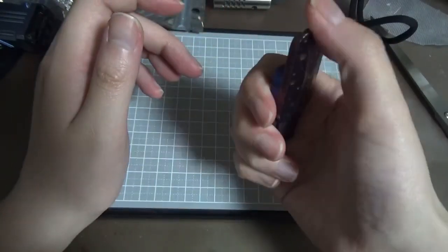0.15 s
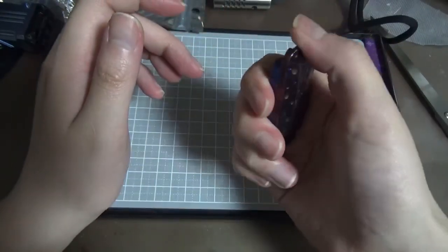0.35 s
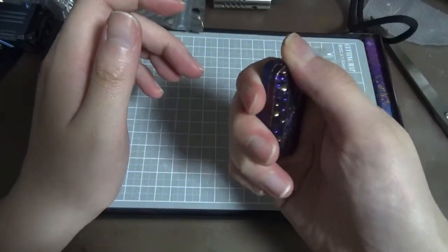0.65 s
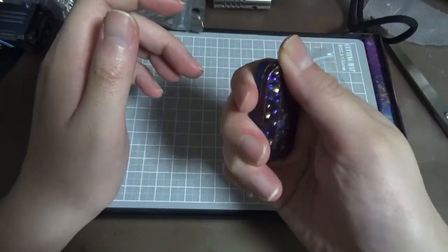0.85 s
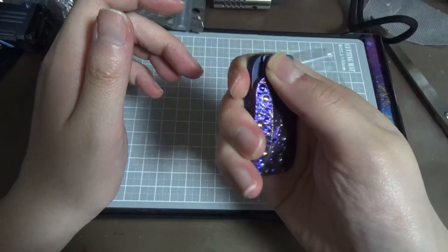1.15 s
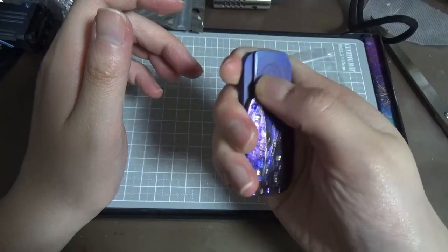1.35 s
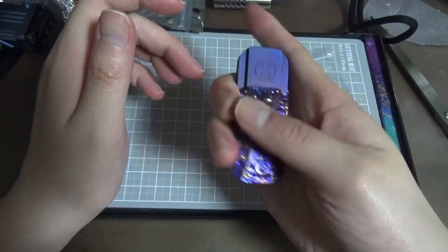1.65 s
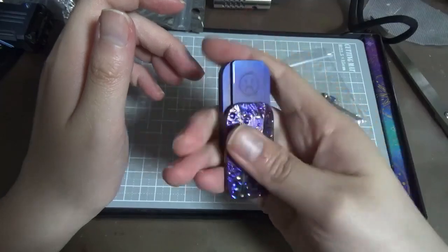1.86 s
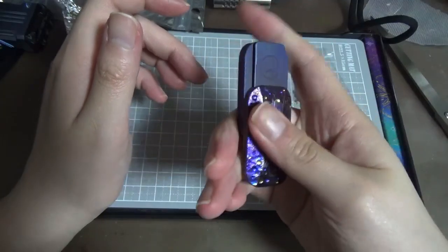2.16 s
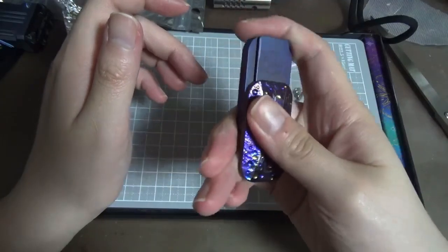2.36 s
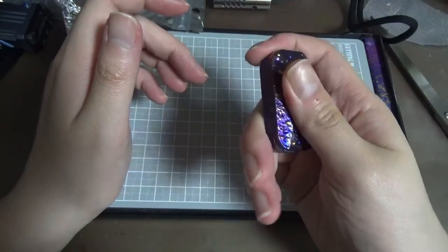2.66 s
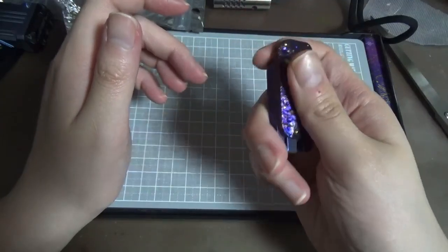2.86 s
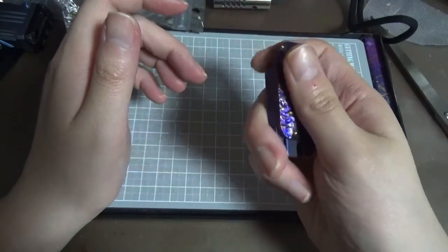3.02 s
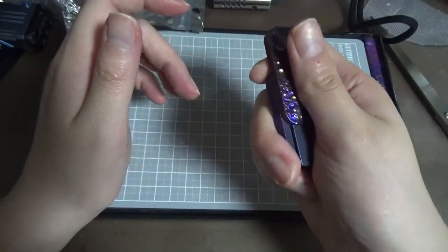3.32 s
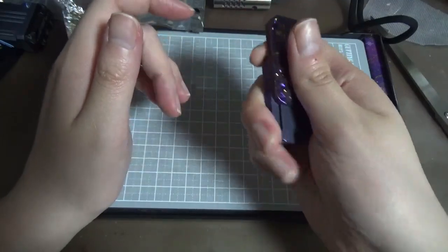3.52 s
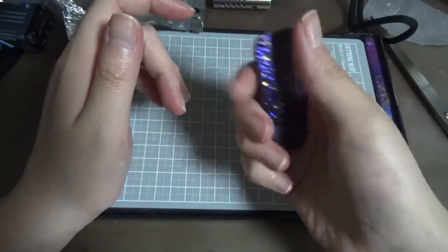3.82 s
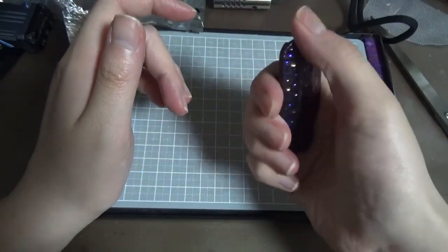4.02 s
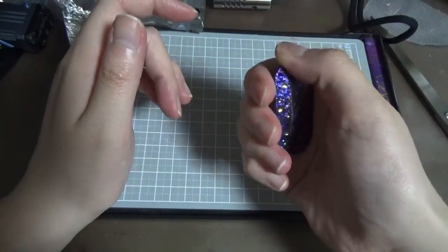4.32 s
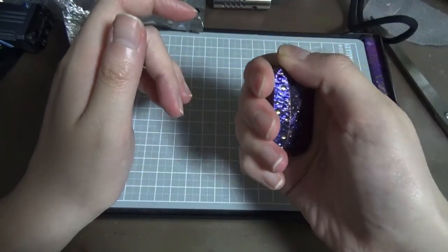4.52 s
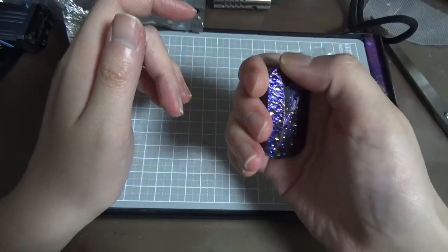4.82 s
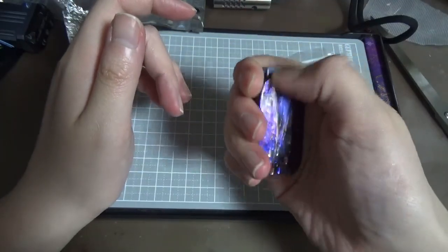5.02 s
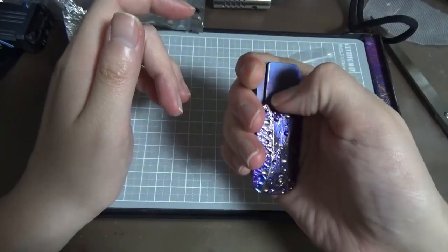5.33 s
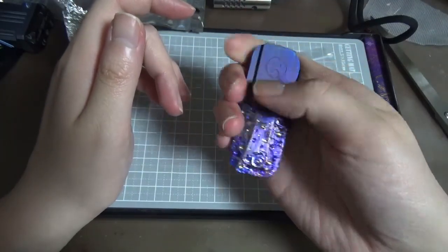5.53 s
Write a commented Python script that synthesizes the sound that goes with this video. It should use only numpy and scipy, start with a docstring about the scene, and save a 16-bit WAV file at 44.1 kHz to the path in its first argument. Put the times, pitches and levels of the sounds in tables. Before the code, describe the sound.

Crisp metallic detent clicks come in rapid bursts with tiny scrapes and gaps between, over faint hum and hiss in a small room.

```python
"""A small room, with a microphone above a desk: a metal slider toy is pushed back and forth in one hand close by.
Its plates scrape briefly (swelling noise), then snap into their detents with short, hand-damped clicks
(bursts of band noise and two decaying sines); now and then a plate sings on (a slowly decaying sine).
Skin rustles on the metal. The loudest clicks overload the recorder.
Early echoes and a short diffuse tail answer, over a faint hum and hiss."""
import sys
import numpy as np
from scipy import signal
from scipy.fft import rfft, irfft, next_fast_len
from scipy.io import wavfile
from scipy.ndimage import map_coordinates

SR = 44100
rng = np.random.default_rng(int(sys.argv[2]) if len(sys.argv) > 2 else 0)


def unload_audio(sound):
    """Save the sound as a 16-bit wav file, at the path given as the first command line argument."""
    columns = np.transpose(np.atleast_2d(sound))
    # keep every value between -1 and 1, then stretch to whole-number steps
    steps = np.round(np.clip(columns, -1, 1) * 32767)
    wavfile.write(sys.argv[1], SR, steps.astype(np.int16))


N = 250488  # length in samples
MIC_HZ = 11130  # upper limit of the microphone

# colour of the metal body: frequency_hz, level_db
BODY_COLOUR = [(100, -32.5), (800, -28), (1150, -22), (1500, -30), (2100, -5.5), (2700, 5.5), (4500, 7),
               (6500, 6), (8300, 11), (10000, 8), (11000, 5.5)]
# the plate scrapes into a detent and snaps home:
# start_s, level_db, lower_resonance_hz, upper_resonance_hz, brightness_db, scrape_db
DETENT_SNAPS = [(0.1885, -4.5, 5480, 8560, 6, -25), (0.2452, -3, 3508, 7810, 2.5, -22),
                (.3713, -8, 3240, 7020, 1, -22), (0.389, -4.5, 2856, 10610, -6, -21),
                (0.8411, -6, 2816, 6490, 0, -21), (.986, -6, 6095, 9870, -3, -23),
                (1.1078, -4.5, 3580, 7330, -0.5, -18.5), (1.1414, -4.5, 3300, 7700, 6, -23.5),
                (1.165, -5.5, 3030, 7730, 6.5, -19), (1.2393, -4, 3280, 10860, -1, -19.5),
                (1.2651, -3.5, 3604, 7620, 2, -21.5), (1.295, -5, 3310, 8380, 1.5, -26),
                (1.337, -2, 3430, 8260, -1, -14), (2.3677, -3, 4580, 7510, -.5, -17),
                (2.385, -3.5, 2950, 6640, -3.5, -22), (2.518, -4, 2620, 10560, 0, -18),
                (2.5781, -5.5, 4240, 10060, 1.5, -20), (2.6445, -4.5, 5420, 7770, 7.5, -19),
                (2.696, -4, 6400, 9100, 10.5, -25), (2.7967, -5.5, 5790, 10030, 1.5, -20),
                (3.0012, -4, 5950, 8170, 10, -20), (3.0385, -3, 4540, 7850, 12, -20),
                (3.0627, -5, 4700, 8000, 6.5, -25.5), (3.0924, -2, 4510, 7720, 10, -25.5),
                (3.1163, -3.5, 4830, 7390, 8, -29), (3.1541, -3.5, 4450, 8660, 6.5, -23.5),
                (4.089, -1.5, 3290, 8550, -0.5, -20), (4.1267, -3.5, 3380, 8900, 3.5, -21),
                (4.2612, -4, 4050, 8440, 7.5, -21), (4.4163, -5, 4330, 8510, 2, -29.5),
                (4.8998, -9, 4230, 8140, -2, -21), (4.997, -11, 4320, 7350, -1.5, -13.5),
                (5.1036, -6, 5020, 6900, 0.5, -28.5), (5.1464, -2, 4470, 8370, 0.5, -22.5),
                (5.1904, -0.5, 4575, 6963, -5, -20), (5.3872, -3, 4052, 8040, -2, -38)]


def amp(db):
    """Decibels to an amplitude ratio."""
    return 10 ** (np.asarray(db) / 20)


def unit(x):
    """Normalise the effective value: scale to rms 1."""
    return x / np.sqrt(np.mean(x ** 2) + 1e-20)


def along(points, hz):
    """Interpolate (frequency_hz, value) points along a logarithmic frequency axis."""
    point_hz, values = np.transpose(points)
    return np.interp(np.log(hz + 1), np.log(point_hz + 1), values)


def filtered(x, response):
    """Linear filtering: the spectrum of x times a response of frequency."""
    n = x.shape[-1]
    padded = next_fast_len(2 * n)
    hz = np.fft.rfftfreq(padded, 1 / SR)
    return irfft(rfft(x, padded) * response(hz), padded)[..., :n]


def lowpassed(x, limit_hz):
    """Band limitation: a very steep, zero-phase low-pass."""
    return filtered(x, lambda hz: 1 / np.sqrt(1 + (hz / limit_hz) ** 160))


def noise(n, colour, lo_hz=0, hi_hz=SR):
    """Spectral shaping: n samples of white noise, coloured within a band and scaled to rms 1."""
    hz = np.fft.rfftfreq(n, 1 / SR)
    in_band = (hz >= lo_hz) * (hz < hi_hz)
    spectrum = rfft(rng.standard_normal(n)) * amp(along(colour, hz)) * in_band
    return unit(irfft(spectrum, n))


def wobble(rate):
    """Slow random modulation: a smooth curve through random knots, rate of them a second."""
    knots = rng.standard_normal(int(N * rate / SR) + 4)
    return map_coordinates(knots, [np.arange(N) * rate / SR])


def add(track, s, sound):
    """Superposition: mix a sound into a track from time s."""
    i = max(0, round(s * SR))
    track[i:i + len(sound)] += sound[:max(0, N - i)]


def background(hiss_db=-55.0, drift_rad=0.5):
    """Stationary coloured noise, and hum tones whose phase drifts in proportion to their frequency."""
    # room noise: frequency_hz, level_db
    hiss_colour = [(25, -19.5), (50, -9), (88, -3), (125, -16), (200, -10.5), (370, -10), (510, -7),
                   (700, -13), (1100, -15.5), (1500, -22.5), (2500, -22.5), (5000, -26.5), (11000, -37.5)]
    # mains and a fan: frequency_hz, level_db
    hum_tones = [(60, -62), (84, -63.5), (120, -70.5), (179.5, -69.5), (497, -66)]
    t = np.arange(N) / SR
    lowest_hz = hum_tones[0][0]
    hum = np.zeros(N)
    for hz, db in hum_tones:
        phase = 2 * np.pi * hz * t + drift_rad * hz / lowest_hz * wobble(6.5)
        hum += amp(db) * unit(np.sin(phase))
    return hum + amp(hiss_db) * noise(N, hiss_colour)


def room(x, wet_db=-19, build_s=0.0033):
    """Diffuse reverberation: convolution with decaying noise, redrawn every 0.2 s."""
    # reverberation time: frequency_hz, t60_s
    reverb_times = [(300, 0.088), (3000, 0.18), (7000, 0.17), (11000, 0.15)]
    out, t = np.zeros(N), np.arange(N) / SR
    step = SR // 5
    for i in range(0, N, step):
        hz, age_s, cells = signal.stft(rng.standard_normal(SR // 3), SR, nperseg=256)
        decay = amp(-60 * age_s / along(reverb_times, hz)[:, None])
        tail = signal.istft(cells * decay, SR, nperseg=256)[1]
        tail *= 1 - np.exp(-(t[:len(tail)] / build_s) ** 2)
        tail /= np.linalg.norm(tail)
        add(out, i / SR, amp(wet_db) * signal.fftconvolve(x[i:i + step], tail))
    return out


def echoes(x):
    """Early reflection: the desk and other near surfaces return delayed, weakened copies."""
    # reflections: delay_s, level_db
    reflections = [(.0062, -32), (.0088, -26.5), (.0105, -31.5), (.0205, -42), (.0235, -34.5)]
    return filtered(x, lambda hz: sum(amp(db) * np.exp(-2j * np.pi * hz * delay) for delay, db in reflections))


def rubs(grit_db=3, steady_db=-70):
    """Skin friction on metal: a faint irregular rustle that swells when the fingers shift their grip."""
    # shifts of grip: centre_s, half_length_s, level_db
    grip_shifts = [(.005, 0.024, -40), (1.545, .012, -57.5), (1.905, 0.074, -59), (3.55, .049, -61),
                   (4.722, .025, -65), (5.644, 0.019, -60)]
    t = np.arange(N) / SR
    level = amp(steady_db + 1.7 * wobble(5.5))
    for s, half_length, db in grip_shifts:
        level += amp(db) * np.exp(-((t - s) / half_length) ** 2)
    grit = unit(amp(grit_db * wobble(580)))
    return level * noise(N, BODY_COLOUR, 0, MIC_HZ) * grit


def rings(waver_db=3.5, choke_s=.015):
    """Free vibration: a plate the fingers let go sounds a thin, wavering tone until a later snap chokes it."""
    # tones: start_s, pitch_hz, level_db, rise_s, t60_s
    free_tones = [(0.39, 2807, -38, .003, 0.27), (.841, 2900, -44, .003, 0.4),
                  (1.337, 3214, -41, 0.0033, 0.35), (1.758, 3770, -48, .003, .2),
                  (1.871, 3260, -43.5, 0.0023, 0.46), (2.021, 8560, -56, 0.0031, .15),
                  (2.384, 5050, -44.5, .003, 0.47), (2.525, 2640, -19.5, .003, 0.063),
                  (2.797, 7560, -34, 0.0027, 0.25), (2.797, 3252, -53, 0.0027, .7),
                  (3.156, 3295, -35, 0.0028, 0.27), (3.438, 3400, -43.5, .003, 0.33),
                  (4.133, 3260, -49.5, .003, 0.41), (4.273, 3950, -41, 0.0033, 0.26),
                  (5.191, 4290, -25.5, 0.0023, .15), (5.193, 4620, -24, .003, 0.15),
                  (5.395, 2730, -34.5, 0.027, 0.49), (5.636, 6000, -41.5, .003, .1)]
    out, t = np.zeros(N), np.arange(SR // 2) / SR
    for s, hz, db, rise, t60 in free_tones:
        later_snaps = [snap[0] - s for snap in DETENT_SNAPS if snap[0] > s + choke_s]
        free_s = min(later_snaps, default=t[-1])
        decay_db = 60 * (t / t60 + np.maximum(t - free_s, 0) / choke_s)
        onset = 1 - np.exp(-t / rise)
        add(out, s, amp(db - decay_db) * onset * np.sin(2 * np.pi * hz * t))
    return out * amp(waver_db * wobble(35))


def slides(swell_db=13, stop_t60_s=0.0025, grit_db=4):
    """Sliding friction: before each snap the scrape grows as the plate speeds up, and dies just after the click."""
    # colour of metal sliding on metal: frequency_hz, level_db
    scrape_colour = [(100, -16.5), (600, -16), (1100, -11), (2200, 3), (5000, 5.5), (8000, -6.5),
                     (11000, 2.5)]
    rest_swell_s = 0.0034  # time to swell by swell_db, from rest
    # softer and longer while the plate keeps moving from detent to detent
    run_gap_s, run_swell_s, run_level_db = .06, 0.0074, -4
    out, t = np.zeros(N), np.arange(-(SR // 25), SR // 100) / SR  # zero at the click
    gaps = np.diff([snap[0] for snap in DETENT_SNAPS], prepend=0)
    for (s, *_, scrape_db), gap in zip(DETENT_SNAPS, gaps):
        offset_db, swell_s = (run_level_db, run_swell_s) if gap < run_gap_s else (0, rest_swell_s)
        rise_db = swell_db * (np.minimum(t, 0) / swell_s + .5)  # zero halfway through the swell
        stop_db = -60 * np.maximum(t, 0) / stop_t60_s
        add(out, s + t[0], amp(scrape_db + offset_db + rise_db + stop_db) * noise(len(t), scrape_colour))
    return out * unit(amp(grit_db * wobble(730)))


def contacts():
    """Impact excitation: yields start_s, level_db, lower_hz, upper_hz, brightness_db, knock_db of each contact."""
    # the plate chatters as it seats: start_s, level_db, lower_resonance_hz
    chatter_hits = [(0.191, -6.5, 5530), (0.1951, -4, 3360), (.201, -5.5, 4540), (0.2515, -4.5, 3390),
                    (.364, -24, 3130), (.377, -3.5, 3210), (0.4119, -7, 2750), (1.112, -5, 3640),
                    (1.1156, -8.5, 2760), (2.3707, -8.5, 3720), (2.375, -4, 2780), (2.379, -9, 2270),
                    (2.5226, -6, 2570), (2.5302, -4.5, 2650), (2.585, -5.5, 5440), (4.0941, -6, 3260),
                    (4.1017, -6, 4500), (4.1325, -6.5, 3570), (4.2735, -6.5, 3460), (4.4134, -10.5, 4250),
                    (4.4223, -8, 5220), (4.9037, -9, 3470), (4.9943, -7, 3360), (5.0, -6, 3550),
                    (5.006, -5.5, 3390), (5.0988, -11.5, 4500), (5.108, -5, 3580), (5.1522, -4.5, 4490),
                    (5.395, -3.5, 5240)]
    # the plates tap together without sliding: start_s, level_db, lower_resonance_hz, brightness_db
    plate_taps = [(0.574, -43, 2760, -21), (.7101, -34, 4500, -24), (0.805, -22, 4400, -14),
                  (1.0935, -23.5, 3870, -5), (1.644, -31.5, 5900, -18), (1.659, -20, 5280, -14.5),
                  (1.7572, -22.5, 6100, -1.5), (1.8744, -37, 3930, -4.5), (2.0197, -19, 6020, -0.5),
                  (2.0848, -38.5, 4360, -7), (3.427, -27.5, 3455, -1), (3.437, -7.5, 4560, -6),
                  (3.454, -18.5, 4790, -15.5), (3.567, -39.5, 5860, -23), (3.5931, -25.5, 5640, -5.5),
                  (3.652, -22.5, 5750, -12), (3.6943, -19, 5510, -12.5), (3.7031, -24, 5600, -15),
                  (3.741, -46, 6050, -11), (3.8283, -2.5, 4730, -2), (3.908, -43, 2140, -15),
                  (4.61, -22.5, 3135, -19.5), (4.8744, -33, 2270, -9), (5.638, -40.5, 5960, -14)]
    # low knock within a click, before pitch and level act on it: time_s, level_db
    knock_levels = [(.19, -32), (.25, -27), (.4, -19), (1.0, -12.5), (1.24, -11.5), (1.3, -30), (1.8, -28),
                    (2.37, -16), (2.6, -13.5), (2.8, -23), (3.1, -28.5), (3.8, -28.5), (4.42, -15.5),
                    (5.0, -20.5), (5.15, -26.5), (5.4, -28)]
    tap_upper_hz = 7855
    knock_db_per_octave = 0.5  # higher-pitched contacts knock slightly more
    knock_softness = .35  # and so do light ones: dB gained per dB of lost level

    def nearest(s):
        """Proximity in time: the snap closest to s."""
        return min(DETENT_SNAPS, key=lambda snap: abs(snap[0] - s))

    snaps = [snap[:5] for snap in DETENT_SNAPS]
    # chatter takes the upper resonance and brightness of the nearest snap
    chatter = [(s, db, hz, *nearest(s)[3:5]) for s, db, hz in chatter_hits]
    taps = [(s, db, hz, tap_upper_hz, bright_db) for s, db, hz, bright_db in plate_taps]
    for s, db, lower_hz, upper_hz, bright_db in snaps + chatter + taps:
        knock_db = np.interp(s, *np.transpose(knock_levels))
        knock_db += knock_db_per_octave * np.log2(lower_hz / 4000) - knock_softness * db
        yield s, db, lower_hz, upper_hz, bright_db, knock_db


def clicks(hold_s=.0011, damp_t60_s=0.012, upper_db=-1, mode_t60_s=0.38, purity=0.28):
    """Modal excitation: a contact drives a dense cluster and two single modes; the hand damps all in milliseconds."""
    attack_s, mode_db = .0003, -1  # rise of a click; single modes against the cluster
    # a firm grip stifles the knock; below this knock level the lowest mode of the cluster rises too
    edge_hz, firm_knock_db, edge_hz_per_db = 2300, -22.5, 35
    out, t = np.zeros(N), np.arange(SR // 40) / SR
    hand_damping = amp(-60 * np.maximum(t - hold_s, 0) / damp_t60_s)
    fade = (1 - np.exp(-(t / attack_s) ** 2)) * hand_damping

    def mode(hz):
        """Damped resonance: one decaying sine of random phase."""
        return amp(mode_db - 60 * t / mode_t60_s) * unit(np.sin(2 * np.pi * (hz * t + rng.random())))

    def cluster(lo_hz, hi_hz):
        """High modal density: modes too close to tell apart, as band noise."""
        return noise(len(t), BODY_COLOUR, lo_hz, hi_hz)

    for s, db, lower_hz, upper_hz, bright_db, knock_db in contacts():
        split_hz = edge_hz + edge_hz_per_db * max(firm_knock_db - knock_db, 0)
        pure_gain = amp(-purity * db)  # light touches ring purer
        knock = unit(fade * cluster(0, split_hz))
        middle = unit(fade * (cluster(split_hz, 6500) + pure_gain * mode(lower_hz)))
        top = unit(fade * (cluster(6500, MIC_HZ) + amp(upper_db) * mode(upper_hz)))
        click = amp(knock_db) * knock + middle + amp(bright_db) * top
        span = SR // 500  # the level is that of the click's energy spread over 2 ms
        add(out, s, amp(db) * click * np.sqrt(span / np.sum(click ** 2)))
    return out


def scene(side_db=-66, width_db=-16, quadrature_db=-33):
    """Mid-side stereo: almost mono, with a little room and noise, and a faint 90-degree-turned toy at the sides."""
    # noise that differs between the channels: frequency_hz, level_db
    side_colour = [(30, -7.5), (70, 1), (200, -3.5), (500, -6.5), (1500, -9), (4000, -19), (11000, -14)]
    toy = clicks() + slides() + rubs()
    mid = toy + echoes(toy) + room(toy) + rings() + background()
    quadrature = filtered(toy, lambda hz: 1j * amp(quadrature_db))  # turned by 90 degrees
    side = amp(side_db) * noise(N, side_colour) + amp(width_db) * room(toy) + quadrature
    return np.array([mid + side, mid - side])


def record(dry, ceiling=1.065, hardness=9):
    """Saturation: a narrow-band microphone, an input that clips on the loudest clicks, and a band limit."""
    x = lowpassed(dry, MIC_HZ)
    x = x / (1 + np.abs(x / ceiling) ** hardness) ** (1 / hardness)
    return lowpassed(x, 15800)


dry = scene()
out = record(dry)
unload_audio(out)
```